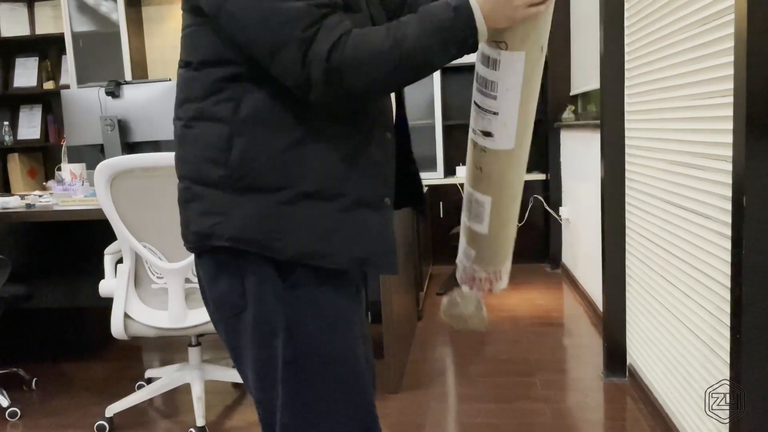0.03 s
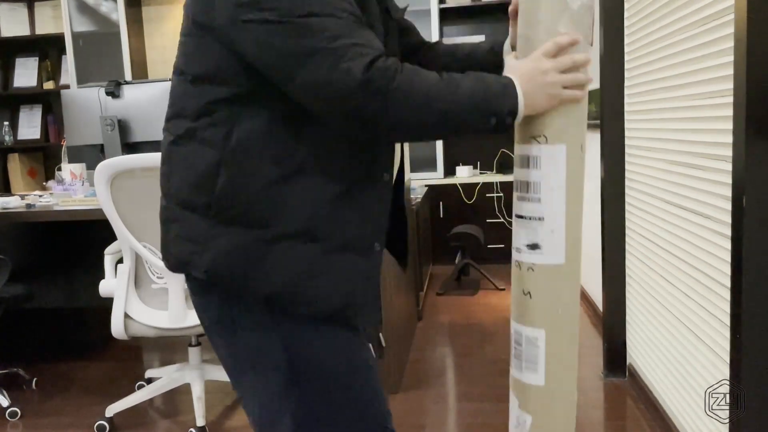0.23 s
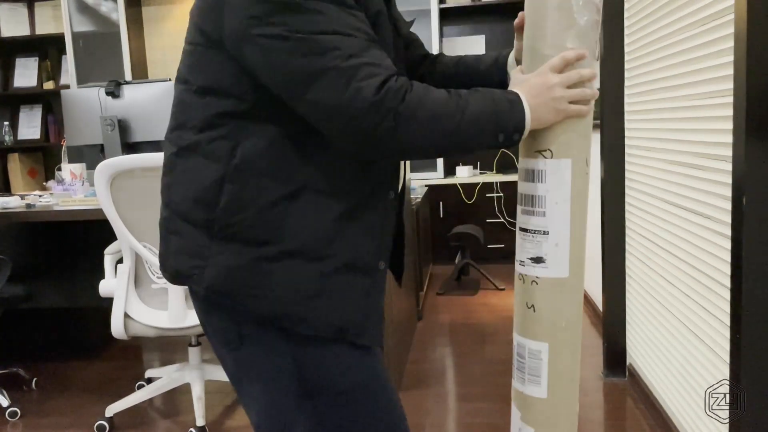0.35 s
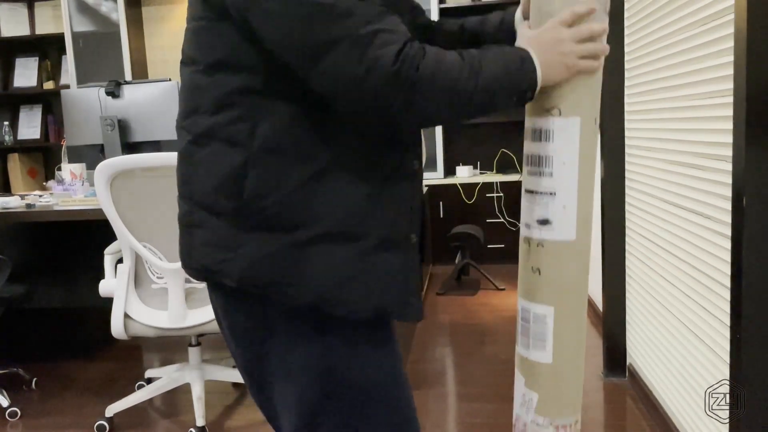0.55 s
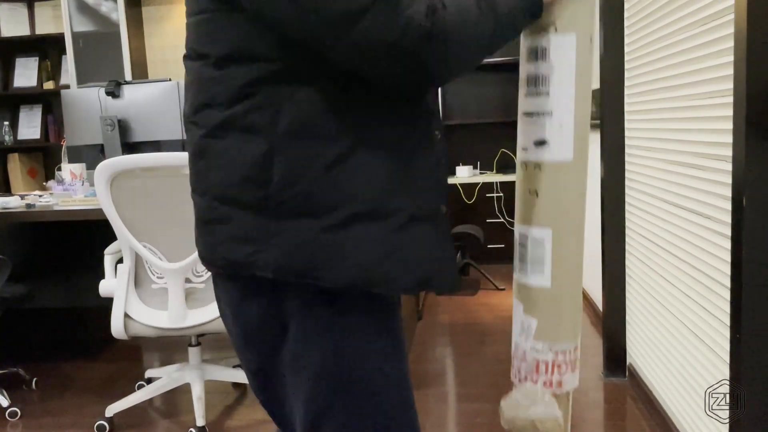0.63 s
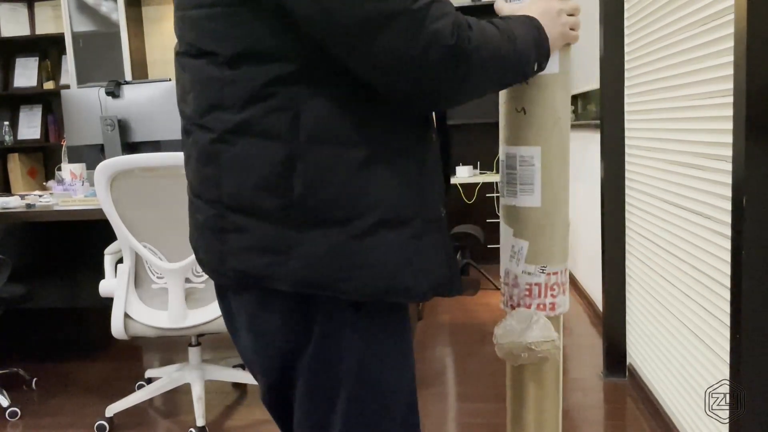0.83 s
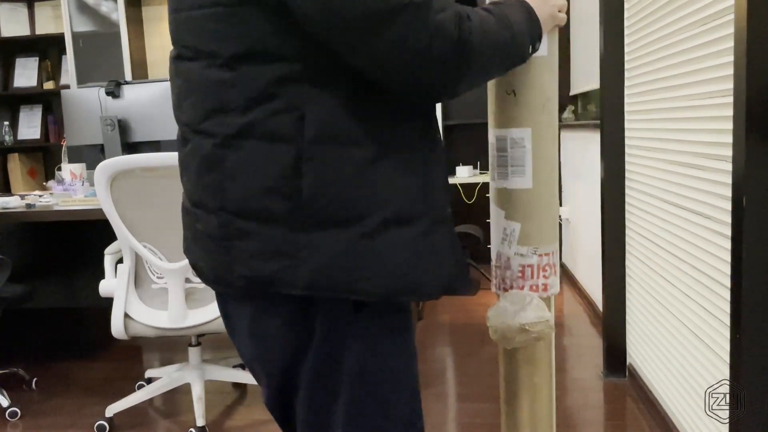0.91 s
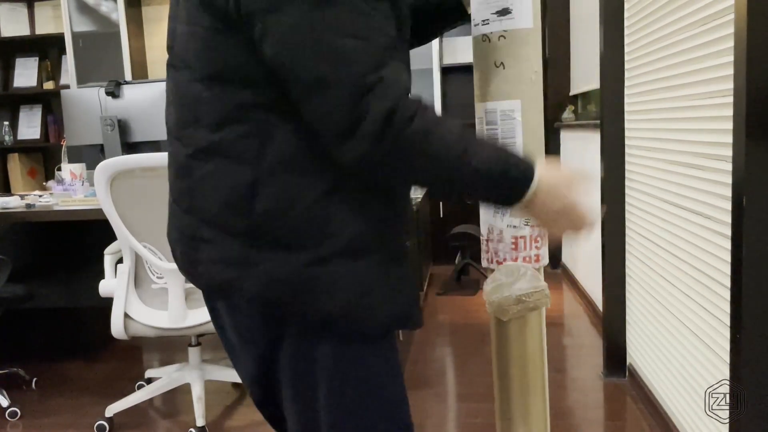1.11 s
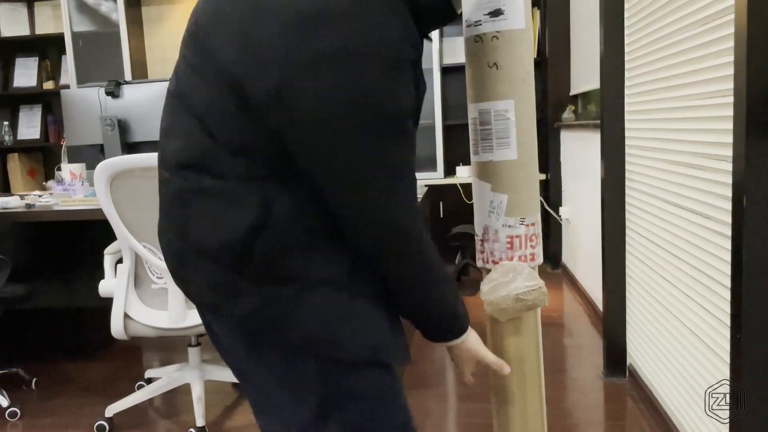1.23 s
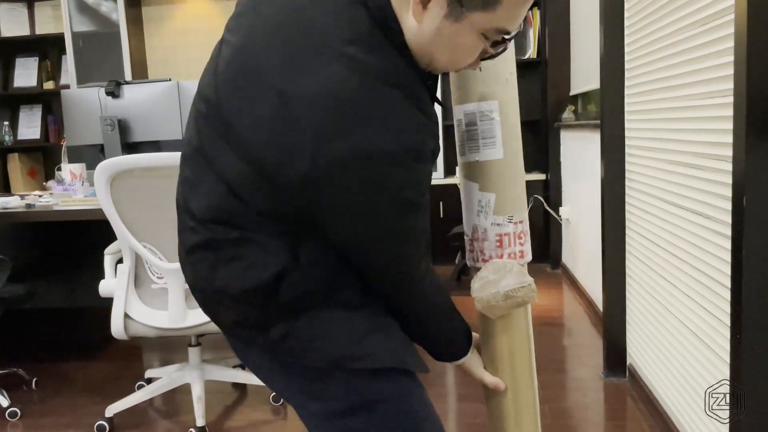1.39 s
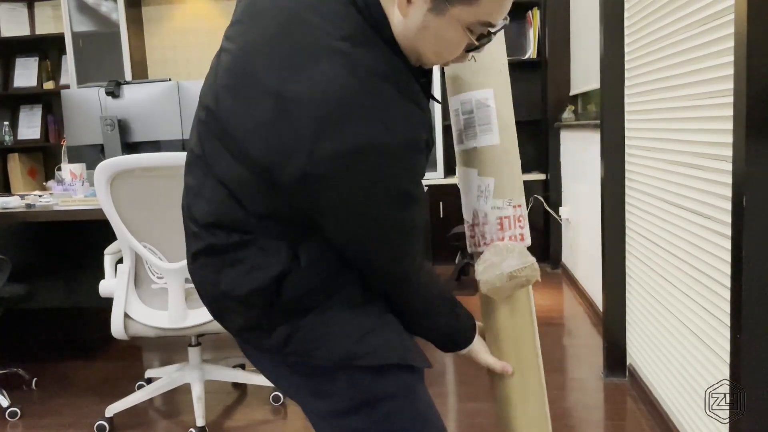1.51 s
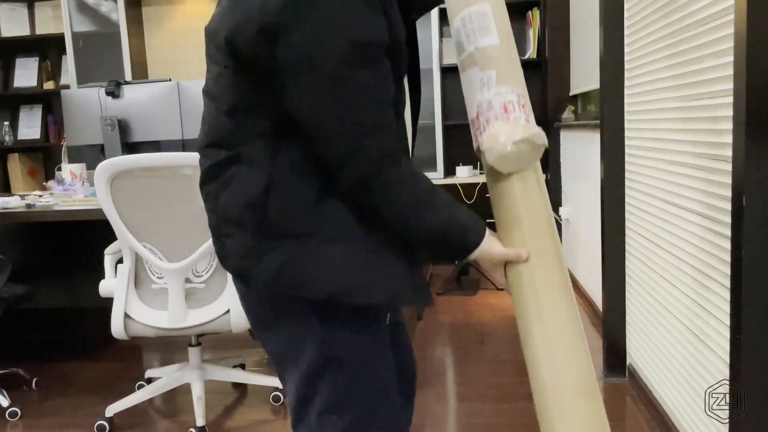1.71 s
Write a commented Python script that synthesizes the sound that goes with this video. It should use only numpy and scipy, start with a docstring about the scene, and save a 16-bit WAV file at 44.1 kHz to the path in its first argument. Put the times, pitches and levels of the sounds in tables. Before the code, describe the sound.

A cardboard tube lands on a wooden floor with one loud, hollow knock at about 0.25 seconds, just after a light scuff and a nylon sleeve swish at 0.1. A short office echo dies away within half a second. The jacket gives a faint zipping swish around 0.65 seconds, and a small dry tick comes at 1 second. Soft rustling and low ventilation continue until about 1.75 seconds.

```python
"""In a quiet office, a long cardboard tube is stood down hard on a wooden floor.
Its rim grazes the boards, crushes and lands with one hollow knock that echoes round the room.
A padded nylon jacket rustles, swishes and makes zipping sounds as the arms move, and the tube's wrapping
gets one small tap. Ventilation rushes softly behind it all. A limiter (an automatic volume control)
turns the knock down and lets the echo swell back."""
import sys
import numpy as np
from scipy.fft import rfft, irfft
from scipy.io import wavfile
from scipy.ndimage import uniform_filter1d, minimum_filter1d

SR = 44100
rng = np.random.default_rng(int(sys.argv[2]) if len(sys.argv) > 2 else 0)


def unload_audio(sound):
    """Save the sound as a 16-bit wav file, at the path given as the first command line argument."""
    columns = np.transpose(np.atleast_2d(sound))
    # keep every value between -1 and 1, then stretch to whole-number steps
    steps = np.round(np.clip(columns, -1, 1) * 32767)
    wavfile.write(sys.argv[1], SR, steps.astype(np.int16))


N = 77175
TIME = np.arange(N) / SR
HZ = np.maximum(np.arange(N + 1) * SR / (2 * N), 1)

# The bright hiss of rubbing nylon. Each row: frequency in Hz, level in dB.
NYLON_HISS = [(2000, -14), (5000, 1.5), (9000, 3.5), (12000, 1.5), (15500, -3.5)]


def tube_knock(room):
    """The rim's push on the floor makes the tube ring, and the room answers with echoes."""
    # The tube stands to the right. Each row: frequency in Hz, left level minus right level in dB.
    balance = [(100, 0.5), (650, -3.5), (1500, 3), (3000, -7), (8000, 5.5)]
    # How strongly the knock fills the room. Each row: frequency in Hz, level in dB.
    echo_levels = [(40, -51), (100, -20.5), (200, -32), (400, -15), (520, -10), (650, -6), (830, -14),
                   (1050, -16), (1300, -22), (1550, -15.5), (2000, -21.5), (3000, -25), (4400, -28.5),
                   (6500, -29.5), (9000, -35), (12000, -42), (15000, -48.5)]
    body = tube_body()
    balance_db = at_hz(balance, HZ)
    sides = from_db([balance_db / 2, -balance_db / 2])
    left_lag_rad = .5 * np.abs(resonance(1000, 2000))
    direct = np.array([np.exp(-1j * left_lag_rad), delay(0)])
    paths = body * sides * (direct + wall_echoes()) + room * from_db(at_hz(echo_levels, HZ))
    return filtered(rim_force(body), paths)


def tube_body():
    """Tube and floor ring briefly. Their bending waves carry high notes faster, giving a falling 'tock'."""
    # The notes they ring at. Each row: frequency in Hz, width in Hz, level in dB.
    notes = [(40, 190, -32.5), (160, 223, -20), (545, 106, -3.5), (694.5, 181, -1), (1500, 310, -9),
             (1720, 135, -7), (2217, 450, -17.5), (3374, 180, -20), (4406, 346, -17.5), (6050, 3300, -34),
             (9340, 870, -26), (13500, 5000, -43)]
    power = sum(np.abs(from_db(db) * resonance(hz, width) ** 2) ** 2 for hz, width, db in notes)
    # Keeping one half of the cepstrum (the log spectrum turned into time) stops sound before the blow.
    cepstrum = irfft(np.log(power + 1e-12))[:N]
    cepstrum[0] /= 2
    travel_s = .002 * np.sqrt(1000 / np.maximum(HZ, 65))  # 2 ms at 1000 Hz, longer for low notes
    travel_phase = 2 * np.pi * np.cumsum(travel_s) * SR / (2 * N)
    return np.exp(spectrum(cepstrum) - 1j * travel_phase)


def rim_force(body):
    """Blows are single clicks and scrapes are many tiny slips, each sized by its sound in the tube."""
    # The rim touches, then lands. Each row: time in seconds, level in dB.
    landings = [(0.1041, -38), (0.2357, 2)]
    # The rim scrapes. Each row: start in seconds, length in seconds, level in dB.
    scrapes = [(0.1070, 0.011, -53.5), (0.2256, 0.015, -44.5), (0.2327, 0.0039, -14)]
    slips_per_s, tilt_db_per_octave = 6100, 0.5
    blows = irfft(sum(from_db(db) * delay(s) for s, db in landings))[:N]
    blows /= np.abs(irfft(body)).max()
    slips = rng.standard_normal(N) * (rng.random(N) < slips_per_s / SR)
    slips = filtered(slips, from_db(tilt_db_per_octave * np.log2(HZ)))
    slips /= filtered(slips, body).std()
    return blows + bursts(scrapes) * slips


def rim_crackle():
    """Paper fibres crackle as the rim is crushed."""
    # Each row: start in seconds, length in seconds, level in dB.
    crushes = [(0.2330, 0.0041, -26.5), (0.2364, .0036, -12.5)]
    # The crackle's tone. Each row: frequency in Hz, level in dB.
    tone = [(900, -2), (2200, 9), (3400, -9.5), (4400, -1.5), (5500, -10), (8000, -4), (9500, -10.5),
            (11200, -8), (13500, -4), (16000, -16.5)]
    return bursts(crushes) * coloured_noise(tone)


def rim_scuffs():
    """The rim first scuffs the boards, duller and less hollow than the knock."""
    # Each row: start in seconds, length in seconds, level in dB.
    scuffs = [(0.1048, 0.02, -44.5), (0.1185, 0.028, -50)]
    # The scuff's tone. Each row: frequency in Hz, level in dB.
    tone = [(70, -19), (160, 10), (260, -15), (380, 15.5), (550, -15), (950, 8), (1500, 1.5), (2100, -29),
            (3000, -18), (8000, -25)]
    return bursts(scuffs) * coloured_noise(tone)


def nylon_zips():
    """Threads click over threads so fast that they whistle; a faster arm gives a higher pitch."""
    # One list for each arm stroke. Each row: time in seconds, pitch in Hz, level in dB.
    strokes = [
        [(.115, 5400, -65), (.150, 5640, -61), (.170, 6870, -49.5), (.192, 8870, -56), (.210, 9450, -47.5),
         (.235, 8860, -53)],
        [(.590, 2768, -73.5), (.626, 4120, -60), (.645, 4770, -70), (.668, 4560, -65), (.690, 4165, -65.5),
         (.725, 2800, -70)],
    ]
    pitch_jitter, flicker_db, octave_db, fade_s = 0.023, 3, -15, .006
    out = 0
    for stroke in strokes:
        s, hz, db = np.transpose(stroke)
        pitch = uniform_filter1d(np.interp(TIME, s, hz), size=600)
        pitch *= 1 + pitch_jitter * wobble(hz=900)
        phase = 2 * np.pi * np.cumsum(pitch) / SR
        whistle = unit_power(np.sin(phase) + from_db(octave_db) * np.sin(2 * phase))
        fade = np.clip(np.minimum(TIME - s[0], s[-1] - TIME) / fade_s + .5, 0, 1)
        level = from_db(np.interp(TIME, s, db) + flicker_db * wobble(hz=250))
        out = out + fade * level * whistle
    return out


def sleeve_swishes():
    """The sleeves rub and give quick, bright puffs of noise."""
    # Each row: time of the peak, rise time and fall time in seconds, then level in dB.
    puffs = [(0.063, 0.00067, 0.0036, -57), (0.114, 0.0073, 0.02, -51.5), (.215, 0.058, .02, -52.5),
             (0.686, 0.075, 0.017, -62.5), (0.692, .003, 0.0059, -53)]
    level = sum(from_db(db) * np.exp(-np.maximum((s - TIME) / rise, (TIME - s) / fall))
                for s, rise, fall, db in puffs)
    return level * coloured_noise(NYLON_HISS)


def jacket_rustle():
    """The jacket rubs softly as its wearer moves, and the level flickers a little."""
    # The soft part of the rustle. Each row: time in seconds, level in dB.
    soft_levels = [(0, -57), (.09, -57.5), (.115, -45), (.15, -54.5), (.23, -54.5), (.32, -54.5),
                   (.55, -61.5), (.69, -62.5), (.85, -69), (1.0, -65.5), (1.15, -66.5), (1.26, -62),
                   (1.38, -68.5), (1.58, -69.5), (1.68, -64), (1.75, -63)]
    # Its tone. Each row: frequency in Hz, level in dB.
    soft_tone = [(150, -0.5), (400, -1), (800, -3.5), (1350, -6.5), (1750, -4), (2050, -2), (2600, -9),
                 (4000, -9.5), (6500, -15), (10000, -23), (15000, -24)]
    # The bright part. Each row: time in seconds, level in dB.
    bright_levels = [(0, -66.5), (.55, -114), (.78, -71), (.85, -76.5), (.95, -76), (1.05, -70),
                     (1.15, -99), (1.25, -79), (1.45, -81.5), (1.75, -75)]
    flicker_db = 1.5
    soft = from_db(np.interp(TIME, *np.transpose(soft_levels))) * coloured_noise(soft_tone)
    bright = from_db(np.interp(TIME, *np.transpose(bright_levels))) * coloured_noise(NYLON_HISS)
    return (soft + bright) * from_db(flicker_db * wobble(hz=29))


def wrapping_tap():
    """A small tap on the tube's wrapping makes a dry tick."""
    # Each row: start in seconds, level in dB.
    taps = [(1.0135, -43.5)]
    # The tick's tone. Each row: frequency in Hz, level in dB.
    tone = [(700, -24), (2000, -2), (5000, 3), (6800, 1), (9000, 5), (11000, -20), (15000, -5)]
    decay_s = .0008
    level = sum(from_db(db) * (TIME > s) * np.exp(-np.abs(TIME - s) / decay_s) for s, db in taps)
    return level * coloured_noise(tone)


def wall_echoes():
    """Sound bounces back dull from walls and ceiling, and rings between them at a few notes."""
    # Single bounces. Each row: delay in seconds, level in dB.
    bounces = [(.0062, -5.5), (.0178, -14), (0.0232, -20), (.0388, -8.5), (.0605, -14), (0.0853, -21),
               (.1195, -30)]
    # The room's own notes (standing waves). Each row: pitch in Hz, level in dB, seconds to fade by 60 dB.
    notes = [(133, 10, 0.69), (226.6, 12, 0.38), (355, 20, .5), (440.6, -6, .45), (592, 9.5, 0.31),
             (627.5, -6, 0.52), (669, -1.5, 0.23), (830, -5, 0.33), (909, 10, 0.28)]
    dull_above_hz = 920
    echoes = sum(from_db(db) * delay(s) for s, db in bounces) / (1 + (HZ / dull_above_hz) ** 4)
    ringing = sum(from_db(db) * resonance(hz, np.log(1000) / (np.pi * fade_s)) for hz, db, fade_s in notes)
    return echoes + ringing


def office_reverb():
    """Countless echoes blur into a tail that builds up, then fades at its own rate in each octave."""
    # Each row: frequency in Hz, seconds to fade by 60 dB.
    fade_times = [(120, 0.83), (350, 0.44), (700, 0.3), (2000, 0.39), (6000, 0.44), (15000, 0.39)]
    gap_s, build_s = .005, 0.002
    noise = diffuse_noise()
    age = np.maximum(TIME - gap_s, 0)
    octaves_hz = 125 * 2. ** np.arange(8)
    tail = 0
    for hz, this_octave in zip(octaves_hz, np.eye(len(octaves_hz))):
        band = filtered(noise, np.interp(np.log(HZ), np.log(octaves_hz), this_octave))
        envelope = (1 - np.exp(-age / build_s)) * from_db(-60 * age / at_hz(fade_times, hz))
        tail = tail + band * envelope / np.linalg.norm(envelope)
    return spectrum(tail)


def ventilation():
    """Moving air makes a low rush, and the fan adds a faint note."""
    # The air's tone. Each row: frequency in Hz, level in dB.
    tone = [(20, -4), (40, -76), (62, -13.5), (95, 1), (170, -9), (310, -13), (385, -18.5), (470, -15),
            (1200, -20.5), (2100, -15), (5000, -22.5), (15000, -43)]
    air = from_db(-63) * coloured_noise(tone)
    fan = from_db(-74) * diffuse_noise(resonance(hz=387.8, width_hz=3.7))
    return air + fan


def bursts(rows):
    """The level over time of short contacts that start at once, sag and stop."""
    return sum(from_db(db) * np.exp(-np.abs(TIME - s) / length) * (TIME > s)
               * np.clip((s + length - TIME) * 2 / length + .5, 0, 1)
               for s, length, db in rows)


def diffuse_noise(colour=1):
    """Stereo noise from all around: the two sides share the low notes but hardly the high ones."""
    # Each row: frequency in Hz, how alike left and right are (0 unrelated, 1 the same).
    likeness = [(60, 1), (200, 0.87), (600, 0.65), (1500, .05), (5000, 0.17), (15000, 0.16)]
    alike = np.clip(at_hz(likeness, HZ), -1, 1)
    mid, side = filtered(rng.standard_normal((2, N)), colour * np.sqrt([1 + alike, 1 - alike]))
    return unit_power(np.array([mid + side, mid - side]))


def coloured_noise(tone):
    """Stereo noise shaped by a table of frequencies and levels."""
    return diffuse_noise(from_db(at_hz(tone, HZ)))


def wobble(hz):
    """A random wavering of typical size 1, mostly slower than the given rate."""
    return unit_power(filtered(rng.standard_normal(N), 1 / (1 + (HZ / hz) ** 2)))


def resonance(hz, width_hz):
    """A filter that rings at one note, with gain 1 at its peak."""
    return 1 / (1 + 1j * (HZ ** 2 - hz ** 2) / (HZ * width_hz))


def delay(s):
    """A filter that makes a sound arrive s seconds later."""
    return np.exp(-2j * np.pi * HZ * s)


def filtered(x, response):
    """Pass a sound through a filter, given as one gain for each frequency."""
    return irfft(spectrum(x) * response)[..., :N]


def spectrum(x):
    """Split a sound into the frequencies listed in HZ."""
    return rfft(x, 2 * N)


def at_hz(points, hz):
    """Read between a table's rows, with octaves evenly spaced."""
    row_hz, value = np.transpose(points)
    return np.interp(np.log(hz), np.log(row_hz), value)


def unit_power(x):
    """Scale a signal to an average power of 1."""
    return x / np.sqrt(np.mean(x ** 2) + 1e-20)


def from_db(db):
    """Turn decibels into a number to multiply by."""
    return 10 ** (np.asarray(db) / 20)


def scene():
    """The tube and the jacket sound in the office, over the ventilation."""
    cloth_echo_db, tap_echo_db = -2, -9
    room = office_reverb()
    scuffs = rim_scuffs()
    cloth = filtered(nylon_zips() + sleeve_swishes(), 1 + from_db(cloth_echo_db) * room)
    tap = filtered(wrapping_tap(), 1 + from_db(tap_echo_db) * room)
    return tube_knock(room) + rim_crackle() + scuffs + cloth + tap + jacket_rustle() + ventilation()


def record(dry):
    """A limiter turns loud peaks down, holds, then recovers; the very highest treble is cut."""
    limit_db, release_db_per_s, cutoff_hz = -9.4, 155, 15900
    hold, look_ahead = int(0.056 * SR), int(0.0039 * SR)
    peak_db = 20 * np.log10(np.abs(dry).max(axis=0) + 1e-9)
    over_db = np.maximum(peak_db - limit_db, 0)
    held_db = -minimum_filter1d(-over_db, hold, origin=(hold - 1) // 2)
    recovery_db = release_db_per_s * TIME
    cut_db = np.maximum.accumulate(held_db + recovery_db) - recovery_db
    cut_db = uniform_filter1d(-minimum_filter1d(-cut_db, look_ahead), look_ahead)  # ease in before a peak
    return filtered(dry * from_db(-cut_db), 1 / (1 + (HZ / cutoff_hz) ** 160))


dry = scene()
out = record(dry)
unload_audio(out)
```